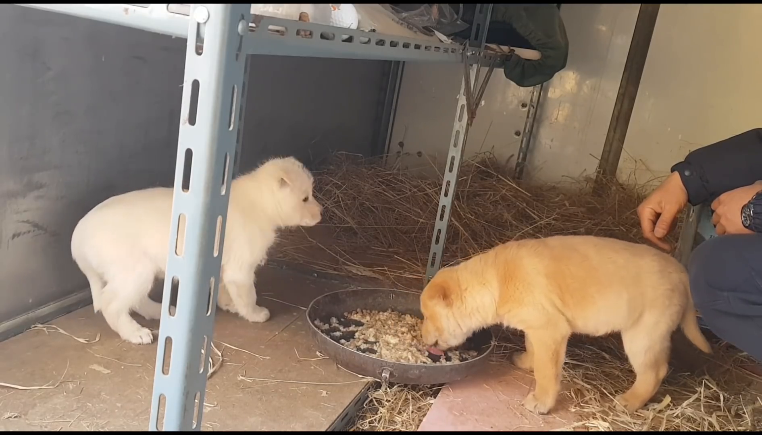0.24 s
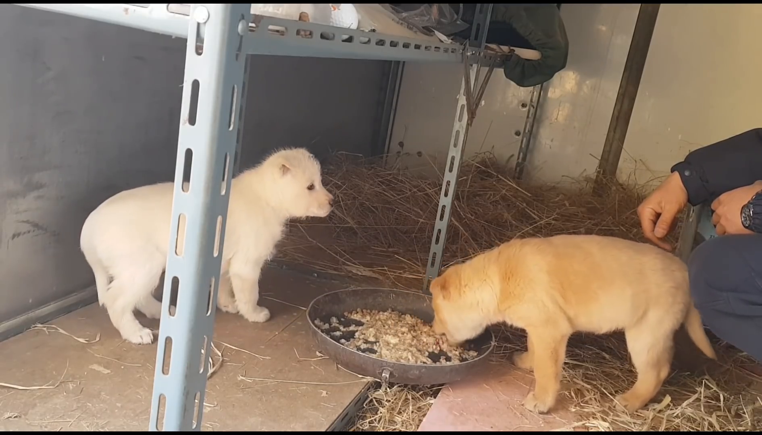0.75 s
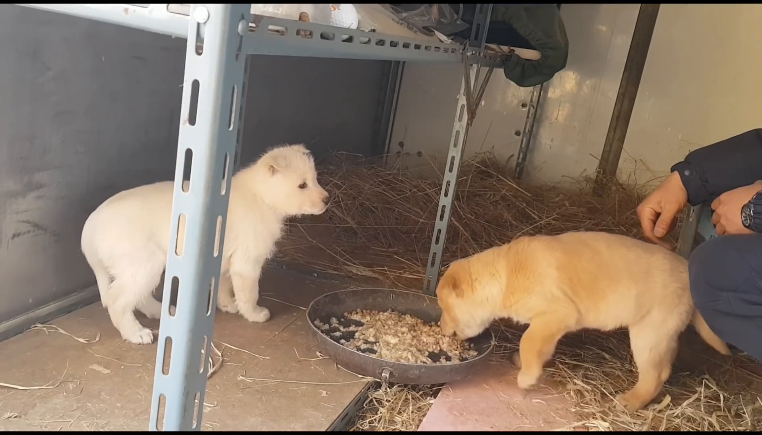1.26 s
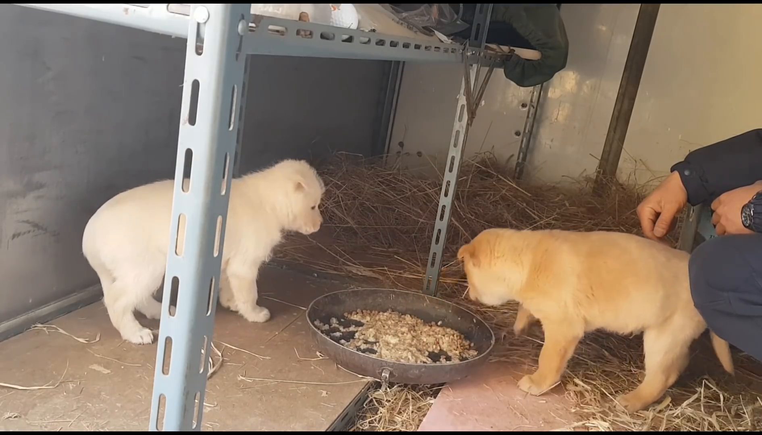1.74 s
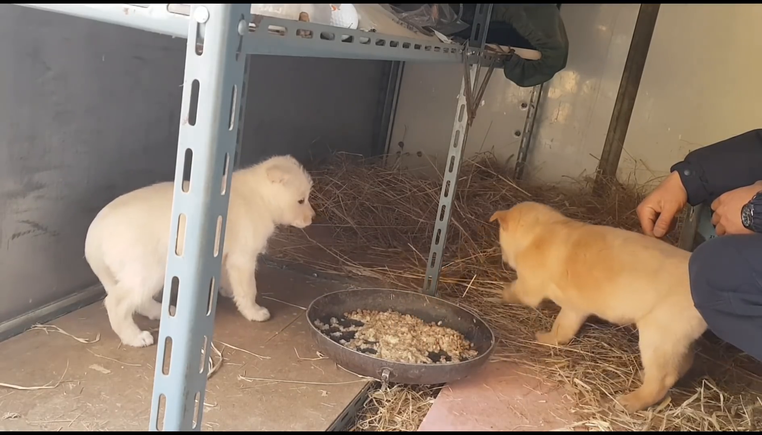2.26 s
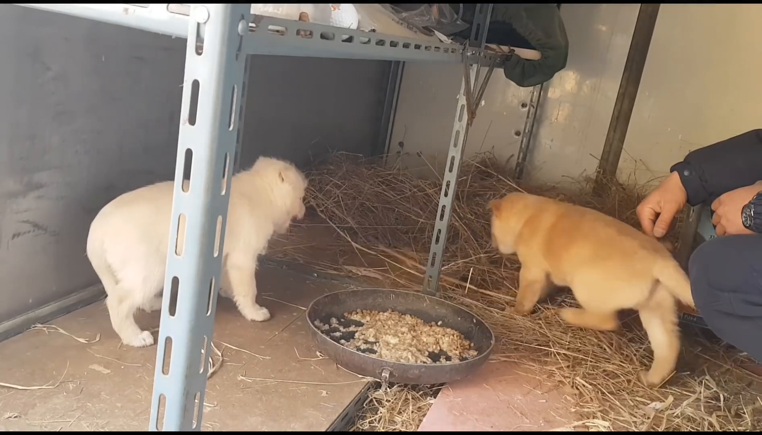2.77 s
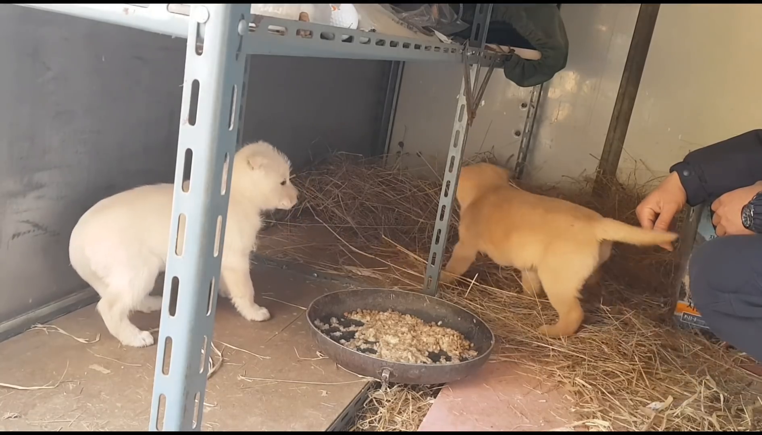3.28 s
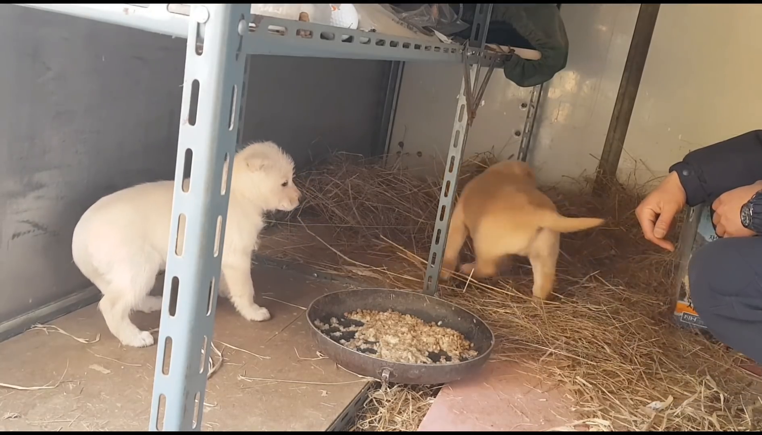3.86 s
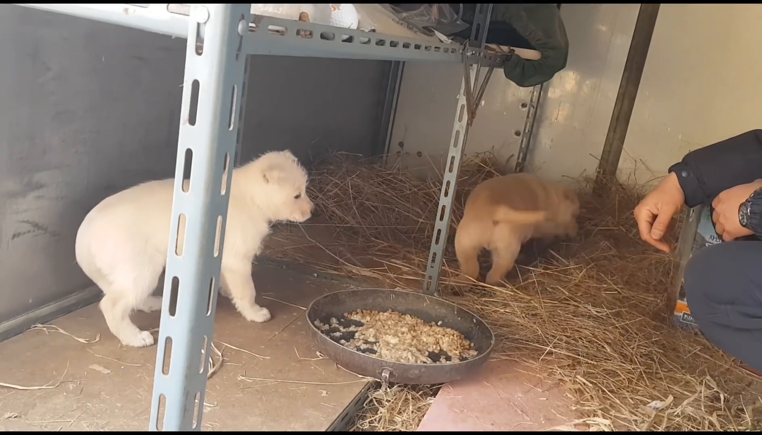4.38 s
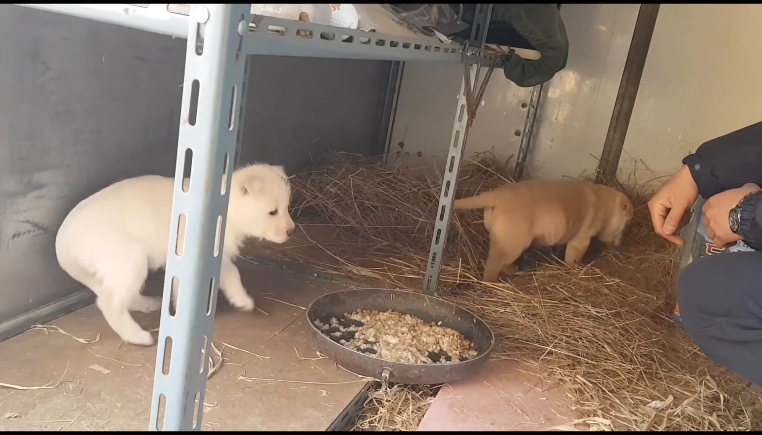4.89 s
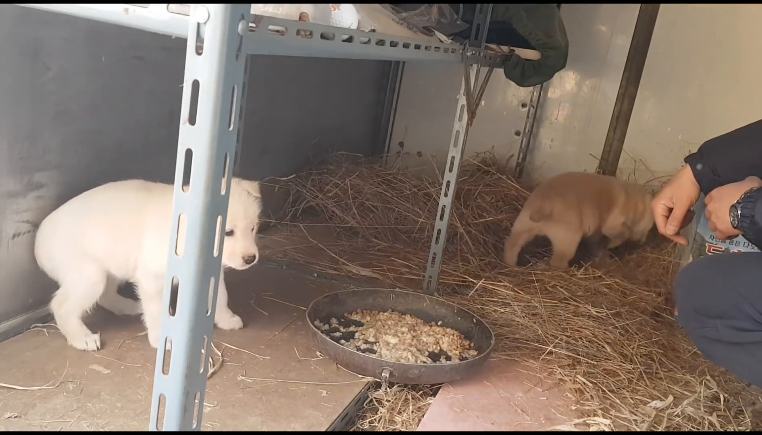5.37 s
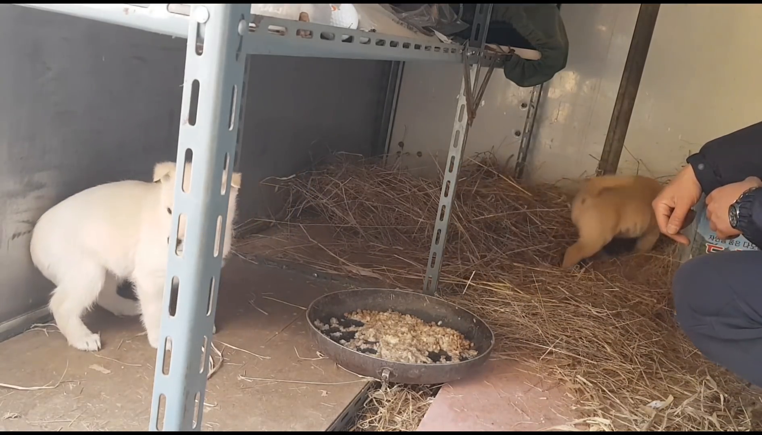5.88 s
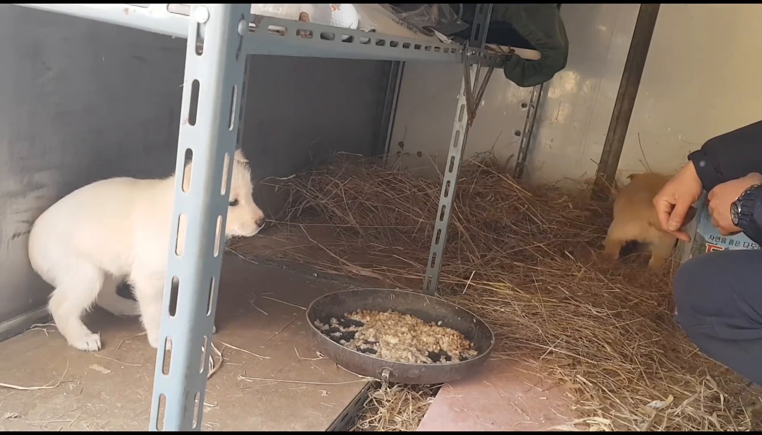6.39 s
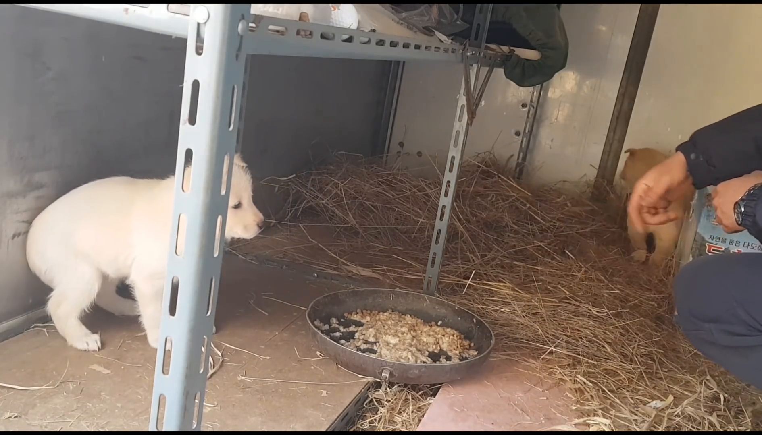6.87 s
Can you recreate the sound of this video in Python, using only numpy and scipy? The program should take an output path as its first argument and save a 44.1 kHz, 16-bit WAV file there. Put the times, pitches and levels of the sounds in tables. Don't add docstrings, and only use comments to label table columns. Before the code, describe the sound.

Gritty, ringing pan slides open the scene, a near-quiet gap follows, then uneven straw rustling, sharp stalk cracks, claw taps and soft thuds.

```python
import sys
import numpy as np
from scipy import signal
from scipy.fft import rfft, irfft
from scipy.io import wavfile
from scipy.ndimage import uniform_filter1d

SR = 44100
rng = np.random.default_rng(int(sys.argv[2]) if len(sys.argv) > 2 else 0)


def rack_gain(trim_db):
    fader = np.asarray(trim_db, float)
    return 10 ** (fader / 20)


def wav_record(signal):
    frames = np.transpose(np.atleast_2d(signal))
    bounded = np.clip(frames, -1, 1)
    quanta = np.round(bounded * 32767).astype(np.int16)
    wavfile.write(sys.argv[1], SR, quanta)


N = 314770
LEFT_LAG = 5
SNAP_TICK = 2.2


def evened(x):
    return x / np.sqrt(np.mean(x ** 2) + 1e-20)


def read(points, hz):
    f, value = np.transpose(points)
    return np.interp(np.log(hz + 1), np.log(f + 1), value)


def played(rows):
    s, *columns = np.transpose(rows)
    return [np.interp(np.arange(N) / SR, s, c) for c in columns]


def coloured(x, points):
    hz = np.fft.rfftfreq(N, 1 / SR)
    return evened(irfft(rfft(x) * rack_gain(read(points, hz)), N))


def band(x, lo_hz, hi_hz):
    return evened(signal.sosfilt(signal.butter(3, [lo_hz, hi_hz], "band", fs=SR, output="sos"), x))


def resonate(x, hz, width):
    turn = np.exp(2j * np.pi * hz * np.arange(x.shape[-1]) / SR)
    r = np.exp(-np.pi * width / SR)
    return 2 * (turn * signal.lfilter([1 - r], [1, -r], x / turn)).real


def grains(per_s, spread_db, clump_db):
    starts = rng.exponential(1, N) * (rng.random(N) < 45 / SR)
    clumps = evened(signal.lfilter([1], [1, -np.exp(-1 / (0.0057 * SR))], starts))
    size = rack_gain(spread_db * np.minimum(rng.exponential(1, N), 3.5) + clump_db * np.minimum(clumps, 3.))
    return evened(size * rng.choice([-1., 1.], N) * (rng.random(N) < per_s / SR))


def scattered(slips, lag, spread):
    at = np.arange(N) + np.round(lag + spread * rng.laplace(size=N)).astype(int)
    return np.array([np.bincount(np.clip(at, 0, N - 1), slips, N), slips])


# frequency in Hz, left-right correlation from 0 to 1.
LIKENESS = [(60, .99), (150, .92), (300, .86), (500, .74), (800, .4), (1300, .1), (2500, 0), (16000, 0)]


def diffuse(pair):
    same = np.clip(read(LIKENESS, np.fft.rfftfreq(N, 1 / SR)), -1, 1)
    left, other = rfft(pair)
    right = irfft(same * left + np.sqrt(1 - same ** 2) * other, N)
    return np.array([np.roll(pair[0], LEFT_LAG), right])


def shed(direct, air, t60, direct_db, wet_db):
    keep = 10 ** (-6 / (t60 * SR))
    stored = np.sqrt(signal.lfilter([1 - keep], [1, -keep], direct[1] ** 2))
    return rack_gain(direct_db) * direct + rack_gain(wet_db) * stored * air


def patchy(x, depth_db):
    z = signal.stft(x, nperseg=256, noverlap=192)[2]
    patches = rng.standard_normal(z.shape[1:])
    patches = uniform_filter1d(patches, size=3, axis=0)
    patches = evened(uniform_filter1d(patches, size=20, axis=1))
    return signal.istft(z * rack_gain(depth_db * patches), nperseg=256, noverlap=192)[1][:, :N]


def hits(rows, tick, rise_s, lag):
    out = np.zeros((2, N + SR))
    t = np.arange(SR // 3) / SR
    for s, db, hz, t60, share in rows:
        blow = rng.standard_normal((2, len(t))) * rack_gain(-60 * t / t60) * (1 - np.exp(-t / rise_s))
        blow[[0, 1], [lag, 0]] += tick
        ring = resonate(resonate(blow, hz, share * hz), hz, share * hz)
        out[:, round(s * SR):][:, :len(t)] += rack_gain(db) * ring / abs(ring).max()
    return out[:, :N]


def swells(s, db, rise_s, fall_s):
    late = np.arange(0, N / SR + .002, .001)[:, None] - s
    return (rack_gain(db - 10 * np.maximum(late / fall_s, -late / rise_s)) ** 2).sum(axis=1)


def level(power):
    return np.interp(np.arange(N) / SR, np.arange(len(power)) / 1000, 10 * np.log10(power + 1e-14))


# peak in seconds, air level in dB, rise of 10 dB in seconds,
# floor thud in dB against the air.
FOOTFALLS = [(-0.0, -51.5, 0.1, -1.66), (0.25, -61.5, 0.1, 19.5), (0.38, -51.5, 0.38, -1.5),
             (0.61, -52, 0.14, -31.5), (1.09, -51.5, 0.17, -25.5), (1.56, -48, 0.1, -21),
             (2.19, -45, 0.1771, -0.72), (2.59, -43, 0.0522, 1.8), (2.74, -47.5, 0.1, -18.5),
             (3.02, -53.5, 0.15, 3), (3.19, -47.5, 0.1056, -16.5), (3.36, -49, 0.1459, 1.2),
             (3.62, -51.5, 0.32, -26), (4.15, -50.5, 0.27, -6.5), (4.26, -39.5, 0.0174, -7.5),
             (4.39, -41.5, 0.01, -14), (4.69, -41, 0.0673, -13.5), (5.26, -54.5, 0.78, -2.5),
             (5.49, -53.5, 0.18, 1.2), (5.68, -51, 0.11, -27.5), (5.88, -53, 0.1, -17.5),
             (6.14, -47, 0.0453, -22.5), (6.5, -44.5, 0.12, -10), (6.79, -57, 0.3, -24.5),
             (7.15, -49.5, 0.0966, -22)]
FOOTFALL_FALL_S, STILL_DB, STILL_THUD_DB = 0.0542, -61.5, -7.5


def footfalls():
    s, db, rise_s, thud_db = np.transpose(FOOTFALLS)
    air_db = level(swells(s, db, rise_s, FOOTFALL_FALL_S) + rack_gain(STILL_DB) ** 2)
    floor_power = swells(s, db + thud_db, rise_s, FOOTFALL_FALL_S)
    floor_db = level(floor_power + rack_gain(STILL_DB + STILL_THUD_DB) ** 2)
    return uniform_filter1d(air_db, size=1300), uniform_filter1d(floor_db - air_db, size=1300)


# frequency in Hz, density in dB per Hz.
HUM_SHAPE = [(12, -59), (25, -18), (50, 4), (70, 10.5), (95, 5.5), (156, -36.5), (200, -16.5), (260, -27),
             (440, -120)]


def hum():
    air_db, thud_db = footfalls()
    air = coloured(rng.standard_normal((2, N)), HUM_SHAPE)
    thud = rack_gain(thud_db - 5.5) * band(air, 104.2, 151.5)
    return rack_gain(air_db) * diffuse(air + thud)


# frequency in Hz, density in dB per Hz.
HISS_SHAPE = [(76, -27.5), (130, -14.5), (168, -19.5), (210, -26), (325, -20.5), (397, -28), (604, -31.5),
              (900, -34.5), (3230, -50), (4300, -40), (6890, -28.5), (9110, -36), (15300, -29.5)]


def hiss():
    return rack_gain(-68.5) * diffuse(coloured(rng.standard_normal((2, N)), HISS_SHAPE))


# time in seconds, grit level of the slide in dB, nose pressure in dB.
PUSH_FIRST = [
    (0.0, -52.5, 7),
    (0.086, -43.5, 4.5),
    (0.138, -40, 1),
    (0.235, -40, 0),
    (0.275, -46, -5),
    (0.344, -52, -7.5),
    (0.366, -56, 2),
    (0.40, -56, -9),
    (0.43, -57, -10),
]
PUSH_SECOND = [
    (0.468, -57, -11),
    (0.482, -50, -5),
    (0.516, -44.5, 0),
    (0.588, -52, 0),
    (0.63, -64, 0),
    (0.672, -80, 2),
    (0.69, -95, -5),
]


def pushes():
    slide_db, press_db = played(PUSH_FIRST + PUSH_SECOND)
    dust_db = -3.7 - 14 * np.arange(N) / SR
    return slide_db + press_db, -press_db, dust_db - press_db


# frequency in Hz, width in Hz, level in dB.
BENDING_MODES = [(258.8, 25.6, -4), (391.5, 12.6, 6.5), (514.2, 27.7, 1.5), (619.5, 7.3, 7), (1040, 18, 0),
                 (1277, 13.5, 3), (1517, 150, -7.5)]
RIM_MODES = [(2765, 63, -7.5), (4193, 150, -7.5), (4400, 116, -2), (5100, 80, -4), (5370, 104, -10.5),
             (6236, 320, -4), (7800, 170, 2.5)]
# frequency in Hz, density in dB per Hz.
GRIT = [(150, -23.5), (400, -4), (1300, 3.5), (2400, -8), (4500, -15.5), (7800, -16), (9200, -16.5),
        (15300, -25)]


def metal(drive):
    def ringing(modes):
        return evened(sum(rack_gain(db) * evened(resonate(drive, hz, w)) * np.sqrt(w) for hz, w, db in modes))

    bare = coloured(drive, GRIT)
    boom = evened(ringing(BENDING_MODES) + 0.603 * band(bare, 192, 1987))
    grit = evened(0.538 * ringing(RIM_MODES) + band(bare, 1633, 7900))
    dust = band(bare, 9000, 15050)
    return boom, grit, dust


def pan():
    t60 = 0.19
    boom_db, grit_db, dust_db = pushes()
    scrape = scattered(grains(per_s=3700., spread_db=1., clump_db=-2.), 2 * LEFT_LAG, spread=1.3)
    boom, grit, dust = metal(scrape)
    boom_air, grit_air, dust_air = metal(diffuse(rng.standard_normal((2, N))))
    slide = shed(rack_gain(boom_db) * boom, boom_air, t60, -0.36, -7.0)
    slide += shed(rack_gain(boom_db + grit_db) * grit, grit_air, t60, -0.92, -1.62)
    slide += shed(rack_gain(boom_db + dust_db) * dust, dust_air, 0.79 * t60, -9.5, -0.71)
    return patchy(slide, depth_db=1.7)


# start in seconds, peak in dB, pitch in Hz, t60 in seconds,
# width as a share of the pitch.
TAPS = [(0.138, -27, 1040, 0.19, 0.89), (0.36, -36.5, 1373, 0.164, 1), (1.043, -59, 1003, 0.327, 1),
        (1.463, -50, 2180, 0.108, 0.46), (2.305, -50, 2500, 0.17, 0.7), (2.464, -37, 1930, 0.11, 0.36),
        (3.157, -37.5, 2070, 0.116, 0.28), (3.187, -41, 1376, 0.138, 0.27), (4.141, -34, 1800, 0.056, 1),
        (4.85, -36, 1870, 0.2, 0.76), (5.415, -33.5, 1560, 0.121, 0.56), (6.473, -37, 946, 0.143, 0.63),
        (7.1, -43.5, 923, 0.44, 0.59)]


def taps():
    return hits(TAPS, tick=5.52, rise_s=0.00103, lag=LEFT_LAG)


# start in seconds, peak in dB, pitch in Hz, t60 in seconds,
# width as a share of the pitch.
THUDS = [(.222, -40, 233.5, 0.253, 0.43), (.24, -45, 113, 0.17, 0.48), (.553, -43.5, 268.5, 0.094, 0.426),
         (.86, -63, 178, 0.18, 0.85), (2.105, -44.5, 370, 0.19, 0.224), (2.15, -49, 133, 0.5, 1),
         (2.72, -53.5, 128, 0.152, 0.38), (3.325, -48.5, 189.8, .17, 0.405), (4.36, -49, 185, 0.25, 1),
         (5.12, -45, 350.7, 0.29, 0.45), (5.16, -53.5, 130, 0.185, 0.77)]


def thuds():
    return diffuse(hits(THUDS, tick=0.31, rise_s=0.0135, lag=0))


# start in seconds, peak in dB, # pitch
# in Hz, t60 in seconds, width as a share of the pitch.
SCUFFS = [(.316, -40, 2600, .08, 1), (.484, -42, 4250, .1, .4), (.66, -56, 12000, .4, .7),
          (.72, -62, 5500, .3, .8), (1.168, -62, 1500, .15, 1), (1.325, -56, 2400, .25, .6),
          (1.365, -57, 1500, .15, .5), (1.495, -56, 2400, .35, .7), (1.83, -52, 2800, .2, .5),
          (1.93, -56, 2800, .15, .5), (1.98, -47, 2900, .2, .6), (2.255, -58, 1900, .2, .6),
          (2.4417, -41, 2870, .1, .6), (2.525, -46, 2100, .2, .7), (2.635, -45, 1300, .2, .7),
          (2.6948, -36, 7000, .05, 1), (2.935, -47, 1400, .2, .5), (3.013, -42, 2700, .15, .25),
          (3.495, -45, 2700, .15, .5), (3.63, -49, 850, .2, .5), (3.66, -49, 1900, .15, .7),
          (3.7223, -45, 2500, .15, .9), (3.795, -45, 1300, .2, .5), (3.8944, -43, 3270, .12, .7),
          (4.3409, -40, 2150, .15, .6), (4.6402, -38, 2660, .12, .8), (4.755, -50, 700, .2, .7),
          (5.195, -49, 1300, .2, .7), (5.545, -50, 1600, .15, .4), (5.6006, -47, 2120, .1, .5),
          (5.636, -43, 2370, .1, .5), (5.672, -45, 2200, .08, .6), (5.795, -45, 2600, .2, .6),
          (5.83, -52, 1400, .15, .5), (5.915, -49, 2700, .15, .5), (6.165, -47, 2600, .18, .5),
          (6.395, -51, 800, .3, .6), (6.755, -48, 1900, .2, .7)]


def scuffs():
    return hits(SCUFFS, tick=3., rise_s=.004, lag=LEFT_LAG)


# start in seconds, peak in dB, pitch in Hz,
# t60 in seconds, width as a share of the pitch.
KIBBLE_LOW = [
    (0.8037, -54.5, 1786, 0.345, 0.208),
    (1.3259, -56, 1260, 0.3, 0.4),
    (1.5254, -56, 1454, 0.37, 0.4),
]
KIBBLE_HIGH = [
    (.762, -56, 7720, 0.39, 0.22),
    (.803, -45, 4600, 0.15, 0.22),
    (1.0236, -51, 8500, 0.25, 1),
    (1.137, -56, 4400, 0.215, 0.163),
    (1.275, -46.5, 5100, 0.154, 0.31),
]


def kibble():
    dull = hits(KIBBLE_LOW, tick=5.52, rise_s=0.00103, lag=LEFT_LAG)
    return dull + hits(KIBBLE_HIGH, SNAP_TICK, rise_s=0.00031, lag=0)


# peak in seconds, level in dB, rise and fall of 10 dB in seconds.
BRUSHES = [(1.35, -51.0, 0.045, 0.03), (1.468, -57, 0.004, 0.1944), (1.82, -51, 0.065, 0.08),
           (1.98, -46.5, 0.06, 0.168), (2.074, -42, 0.071, 0.0648), (2.167, -44.5, 0.1084, 0.01),
           (2.453, -41.5, 0.03, 0.0482), (2.6, -50, 0.08, 0.012), (2.625, -44, 0.004, 0.05),
           (2.7, -49.5, 0.004, 0.14), (2.77, -41.5, 0.027, 0.0118), (2.843, -46, 0.0353, 0.1071),
           (3.058, -42.5, 0.125, 0.0554), (3.225, -46.5, 0.0754, 0.07), (3.318, -51.5, 0.0456, 0.06),
           (3.505, -44.5, 0.07, 0.11), (3.595, -47, 0.1472, 0.0365), (3.735, -43.5, 0.02, 0.0864),
           (3.894, -45.0, 0.0126, 0.1043), (4.227, -39.5, 0.076, 0.0425), (4.299, -48.5, 0.0153, 0.16),
           (4.396, -39.5, 0.0687, 0.053), (4.642, -38.5, 0.02, 0.0631), (4.926, -39.9, 0.1152, 0.05),
           (5.133, -46, 0.056, 0.162), (5.467, -44, 0.08, 0.0649), (5.646, -47, 0.047, 0.2969),
           (6.032, -52.5, 0.05, 0.0047), (6.485, -44, 0.5029, 0.04), (6.662, -48.5, 0.14, 0.11),
           (6.866, -47.5, 0.35, 0.98)]
# peak in seconds, scuff in dB, fall of 10 dB in seconds,
# weight in dB against the scuff.
TREADS = [(1.606, -62.5, 0.072, -14.5), (2.075, -41, 0.0527, -13.5), (2.136, -40.5, 0.0261, -12.5),
          (2.481, -51, 0.0334, -15), (2.616, -49, 0.0567, -17), (2.726, -57, 0.0524, -1.13),
          (2.873, -50.5, 0.1214, -14.9), (3.045, -47.5, 0.12, -12.5), (3.198, -55, 0.11, -10.5),
          (3.572, -46.5, 0.04, -16), (3.649, -60, 0.01, 0.43), (3.735, -55.5, 0.02, -24),
          (3.818, -52.5, 0.0337, -5), (3.935, -49.5, 0.0825, -8.5), (4.153, -50.5, 0.08, -8.5),
          (4.222, -43.5, 0.0461, -12.5), (4.368, -43.5, 0.0473, -7), (4.508, -51.5, 0.12, -7.5),
          (4.659, -45.5, 0.0563, -9), (4.891, -43.5, 0.0793, -6.5), (5.118, -47.5, 0.054, -10),
          (5.351, -50.5, 0.1021, -14), (5.46, -47.0, 0.0551, -16), (5.64, -50, 0.0388, -22.5),
          (6.125, -52, 0.0438, -20), (6.461, -51, 0.045, -5), (6.713, -57.5, 0.02, -18),
          (7.071, -58.5, 0.244, -0.9)]
# time in seconds, level in dB, depth of the shifting in dB.
BUSTLE = [(0.98, -80, -2), (1.28, -66, -2), (1.7, -72.5, -2), (1.9, -65.5, -3), (2.37, -66, -4),
          (2.54, -51.5, 0), (3.37, -62, -4), (3.68, -53.5, 0), (3.99, -65.5, -2), (4.09, -49, -2),
          (4.55, -50, -4), (5.03, -55.5, -8), (5.58, -55.5, -5), (5.96, -55.5, -3), (6.3, -54, -4),
          (6.58, -59, -2), (7.08, -51.5, -2), (7.14, -43, 0)]
# level in dB, for the crackle, slide, scuff and weight layers in turn.
BRUSH_MIX = [0, -2, -10.5, -34]
TREAD_MIX = [-6.5, -1.48, 0, 0]
BUSTLE_MIX = [0, -1.9, -7.5, -19]
# change in dB, for the same layers.
AT_EDGE_DB = [0, -.4, -5.5, -3]


def paws():
    brush = swells(*np.transpose(BRUSHES))
    s, db, fall_s, weight_db = np.transpose(TREADS)
    rise_s = 0.746 * fall_s
    scuff = swells(s, db, rise_s, fall_s)
    weight = swells(s, db + weight_db, rise_s, fall_s)
    ms = np.arange(len(brush))
    at_edge = ms < 1000 * 2.02
    when, bustle_db, depth_db = np.transpose(BUSTLE)
    top = rack_gain(np.interp(ms / 1000, when, bustle_db)) ** 2
    deep = rack_gain(np.interp(ms / 1000, when, bustle_db + depth_db)) ** 2
    treads, bustles = (scuff, scuff, scuff, weight), (top, top, deep, deep)
    layers = []
    for a, edge_db, b, c, tread, bustle in zip(BRUSH_MIX, AT_EDGE_DB, TREAD_MIX, BUSTLE_MIX, treads, bustles):
        power = brush * rack_gain(a + edge_db * at_edge) ** 2
        power = power + tread * rack_gain(b) ** 2 + bustle * rack_gain(c) ** 2
        layers.append(level(power))
    return [layers[0]] + [layer - layers[0] for layer in layers[1:]]


# frequency in Hz, density in dB per Hz.
STRAW = [(88, -38), (150, -15), (345, -10), (452, -14), (518, -9), (692, -10), (925, -6), (1750, 0.5),
         (1970, -0.5), (6500, -0.68), (7750, 3), (8730, -4.5), (12400, 0.5), (15300, -2.5)]
# lower edge in Hz, upper edge in Hz.
STRAW_EDGES_HZ = [(8800, 16500), (3500, 8800), (950, 3500), (170, 950)]
STRAW_T60 = [.09, .11, .14, .16]


def straw():
    spread = 4.
    crackle_db, *layers_db = paws()
    crowd = scattered(grains(per_s=2500., spread_db=2.6, clump_db=1.), LEFT_LAG, spread)
    air = coloured(diffuse(rng.standard_normal((2, N))), STRAW)
    out = np.zeros((2, N))
    for edges, rel_db, t60 in zip(STRAW_EDGES_HZ, [0] + layers_db, STRAW_T60):
        own = scattered(grains(per_s=1500., spread_db=1.0, clump_db=-0.5), LEFT_LAG, spread)
        direct = rack_gain(crackle_db + rel_db) * band(coloured(crowd + 0.81 * own, STRAW), *edges)
        out += shed(direct, band(air, *edges), t60, direct_db=-3., wet_db=-1.705)
    return patchy(out, depth_db=1.5)


# start in seconds, peak in dB, pitch in Hz, t60 in seconds,
# width as a share of the pitch.
PADS = [(1.12, -65, 500, .3, .9), (2.65, -55, 350, .2, .7), (3.305, -56, 220, .2, .6),
        (3.33, -64, 600, .2, .6), (3.46, -62, 260, .25, .6), (3.6, -56, 280, .2, .7),
        (4.75, -52, 330, .2, .7), (4.975, -53, 330, .2, .7), (5.04, -54, 750, .15, .5),
        (5.17, -55, 380, .2, .6), (6.36, -58, 750, .25, .5), (6.56, -62, 300, .35, .7),
        (6.635, -61, 450, .2, .8)]


def pads():
    return diffuse(hits(PADS, tick=.3, rise_s=.015, lag=0))


# start in seconds, peak in dB, pitch in Hz, t60 in seconds,
# width as a share of the pitch.
SNAPS = [(1.1788, -47, 6340, 0.133, 1), (1.4642, -42, 11600, 0.093, 0.79),
         (1.5804, -43, 11800, 0.176, 0.96), (1.7508, -45, 11180, 0.103, 0.58),
         (1.7955, -41.5, 12100, 0.118, 0.48), (2.3987, -36.5, 9550, 0.112, 0.62),
         (2.439, -42.5, 13200, 0.122, 0.72), (2.6214, -28, 14800, 0.07, 0.3),
         (2.6282, -28, 14030, 0.067, 0.32), (2.6943, -29.5, 12670, 0.084, 0.72),
         (2.7585, -36.5, 12500, 0.098, 0.59), (3.724, -36, 7560, 0.103, 0.52),
         (3.895, -32.5, 10900, 0.114, 0.73), (4.8538, -32, 8090, 0.094, 0.8),
         (6.0257, -39, 11600, 0.11, 0.5)]


def snaps():
    return hits(SNAPS, SNAP_TICK, rise_s=0.00031, lag=0)


# start in seconds, peak in dB, pitch in Hz,
# t60 in seconds, width as a share of the pitch.
CRACKS_LOW = [
    (3.144, -33.5, 2030, 0.036, 0.53),
    (3.177, -36.5, 1790, 0.029, 0.475),
    (3.223, -40, 2740, 0.0285, 0.325),
    (4.15, -34, 1790, 0.039, 0.7),
    (4.865, -32, 2500, 0.031, 0.56),
    (6.48, -39.5, 940, 0.042, 0.45),
    (7.124, -38.5, 935, 0.041, 0.43),
]
CRACKS_HIGH = [
    (2.1215, -35.5, 6000, 0.0114, .9),
    (2.145, -27, 5000, 0.0122, 0.98),
    (2.6212, -33, 7500, .04, 1),
    (4.149, -28.5, 9700, 0.0113, .9),
    (4.9066, -31, 12500, 0.011, 0.98),
    (5.0288, -36, 6500, 0.007, 0.9),
    (5.029, -26, 14500, .006, .4),
    (5.0327, -36, 9000, .02, 0.82),
    (5.035, -35.5, 13500, 0.038, 0.57),
]


def cracks():
    thick = hits(CRACKS_LOW, tick=8.2, rise_s=0.00196, lag=0)
    return thick + hits(CRACKS_HIGH, SNAP_TICK, rise_s=0.000123, lag=0)


def scene():
    room = hum() + hiss()
    floor = pan() + taps() + thuds() + kibble() + pads()
    bedding = scuffs() + straw() + snaps() + cracks()
    return room + floor + bedding


def roll_off(x):
    return signal.sosfilt(signal.butter(12, 16770, fs=SR, output="sos"), x)


def record(dry):
    low_pass = signal.firwin(801, 15560, window=("kaiser", 6), fs=SR)
    limited = signal.oaconvolve(dry, low_pass[None], "same")
    mix = limited * rack_gain(np.array([[.4], [-.4]]))
    return roll_off(mix)


dry = scene()
out = record(dry)
wav_record(out)
```